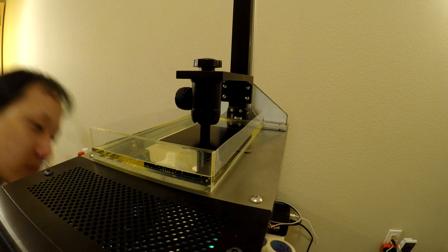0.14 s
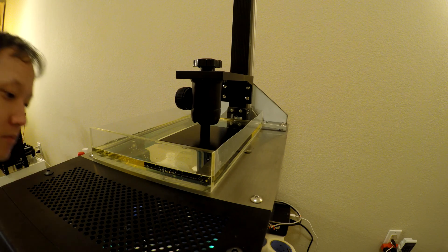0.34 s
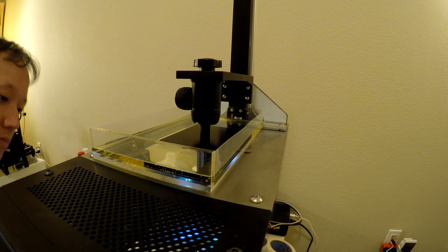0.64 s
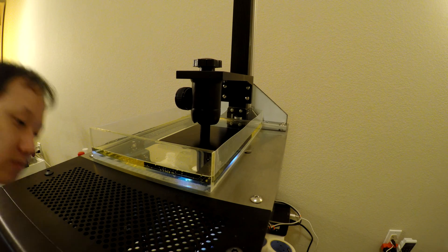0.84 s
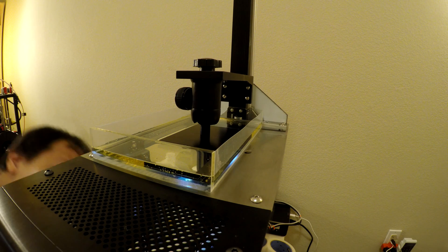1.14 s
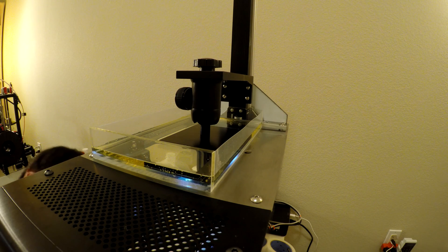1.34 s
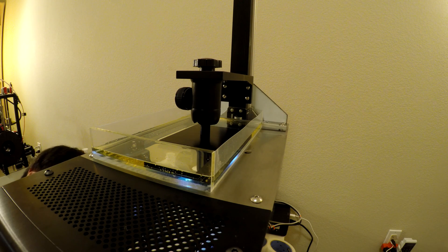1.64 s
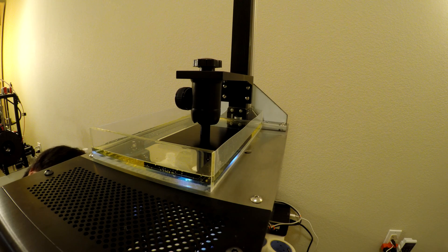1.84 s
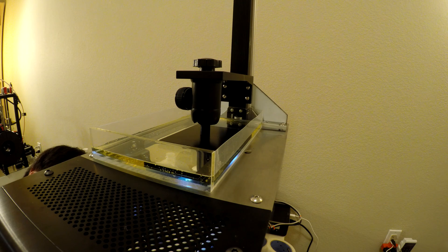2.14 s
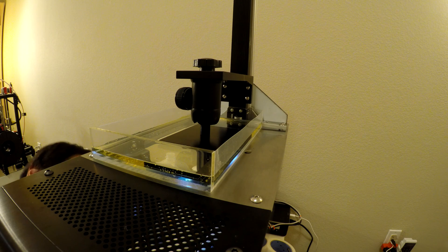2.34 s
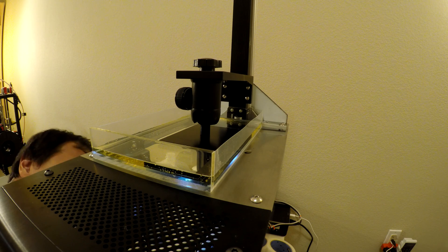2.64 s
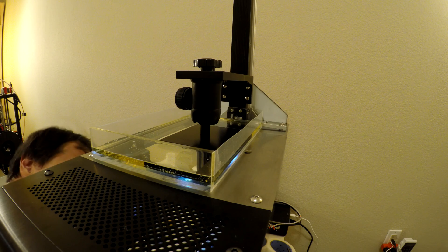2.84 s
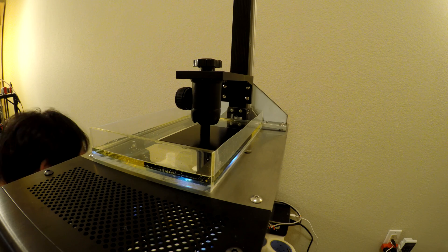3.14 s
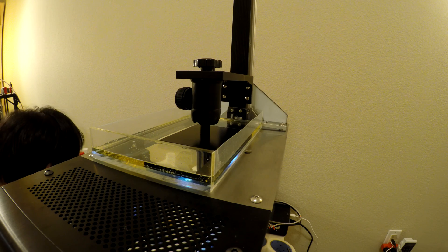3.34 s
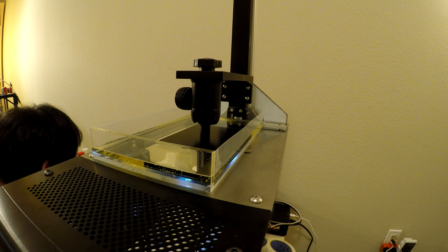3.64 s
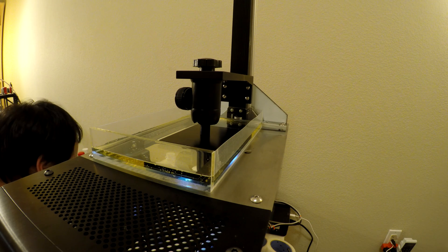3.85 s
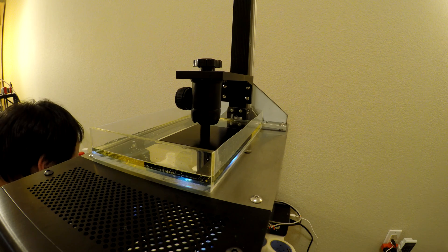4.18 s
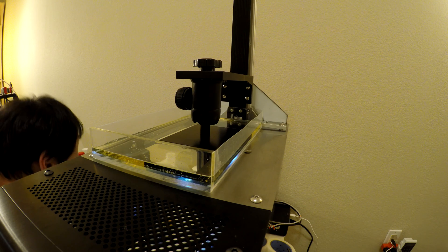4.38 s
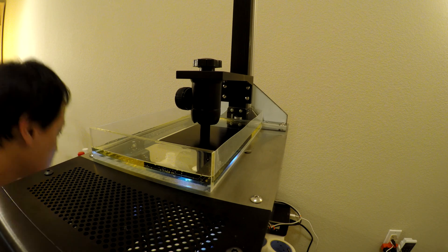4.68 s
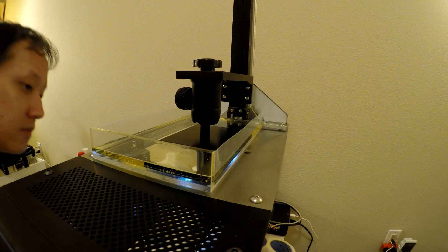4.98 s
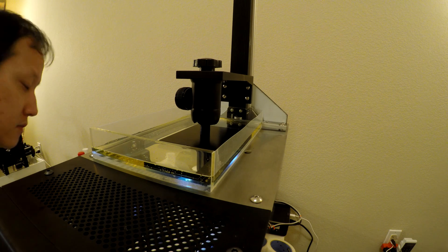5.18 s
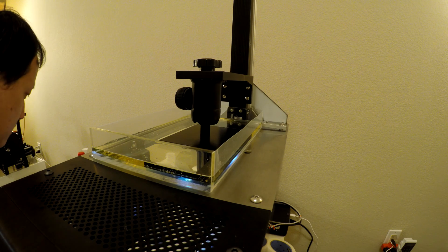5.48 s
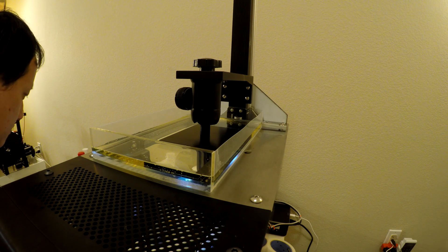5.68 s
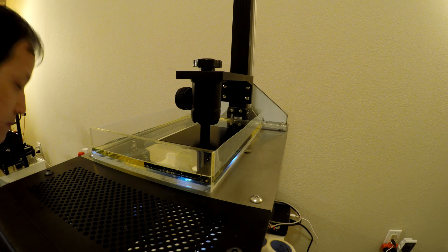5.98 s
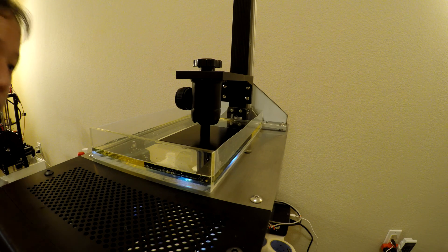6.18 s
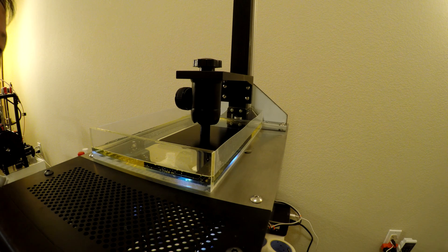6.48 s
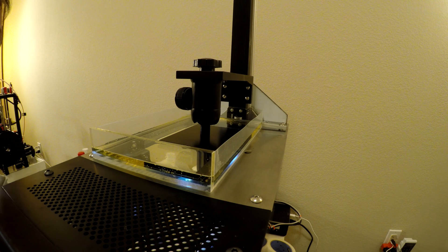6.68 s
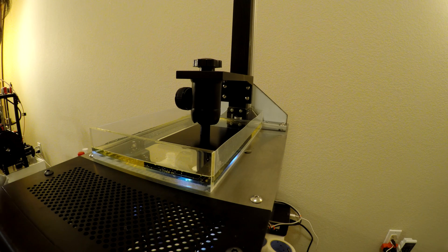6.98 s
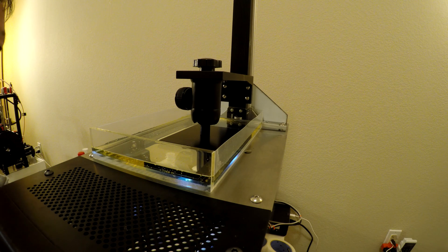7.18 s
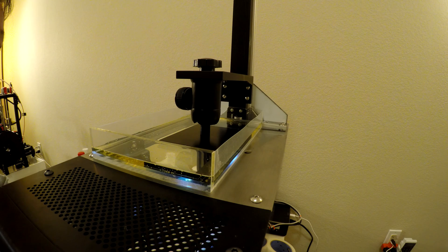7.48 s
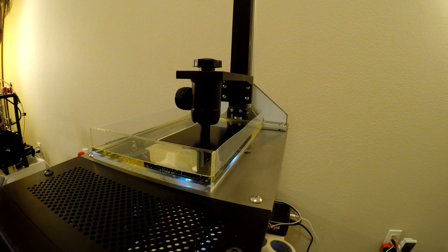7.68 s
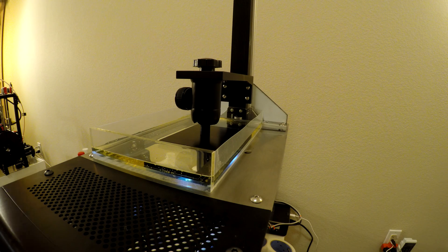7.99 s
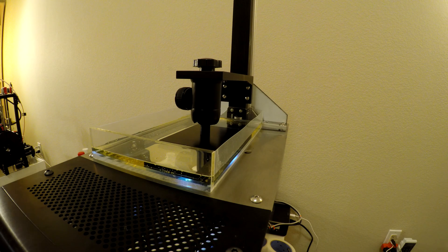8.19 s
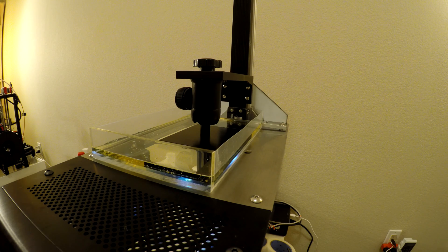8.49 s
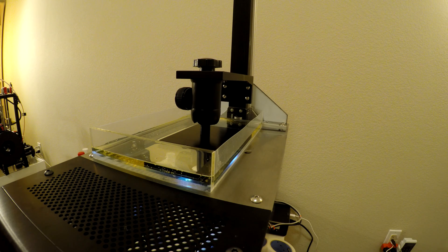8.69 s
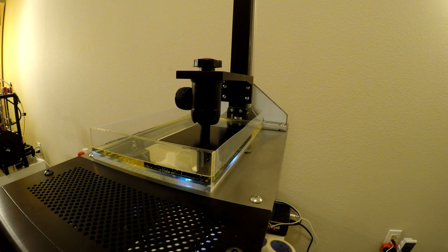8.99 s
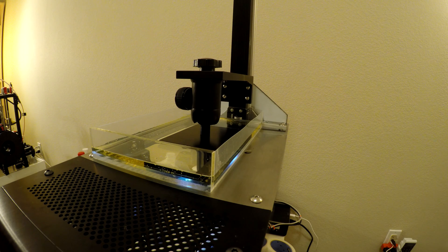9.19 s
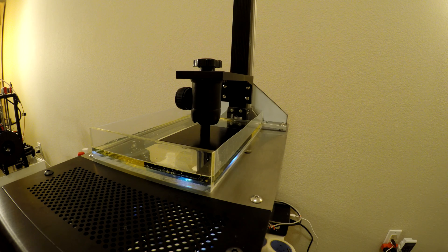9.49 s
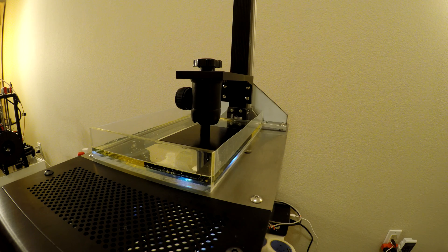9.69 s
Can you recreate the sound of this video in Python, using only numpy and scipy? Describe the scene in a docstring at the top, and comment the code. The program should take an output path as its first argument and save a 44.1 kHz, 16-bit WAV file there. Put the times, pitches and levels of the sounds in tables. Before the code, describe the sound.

Close to an idling printer-like machine indoors: constant low hum, slightly wavering fan tones and airy whirr. Someone handles it early on, with faint brushing, dull double taps, small ticks and a sharp snapping click, then a hard knock with a bright metallic rattle, a low boomy panel thud and a quick double tick. Short room reflections follow. The rest is uninterrupted machine drone, save one faint late tick.

```python
"""Idling printer, handled by someone

A printer idles in a small workroom: its supply hums and its fans whirr, all built from wandering sine partials.
Rotor vibration throbs in the bench; filtered noise gives rumble, rush, case resonances and a faint high hiss.
Early on come taps, brushes, a sharp click, a knock that rattles and a panel settling; one faint tick comes late.
Blows are noise cracks with ringing modes, thuds are decaying low sines and brushes are bursts of grainy noise."""
import sys
import numpy as np
from scipy import signal
from scipy.fft import rfft, irfft, next_fast_len
from scipy.io import wavfile

SR = 44100
rng = np.random.default_rng(int(sys.argv[2]) if len(sys.argv) > 2 else 0)


def transcribe(signal):
    """Save signal, clipped to [-1, 1], as a 16-bit WAV file at the path in sys.argv[1]."""
    frames = np.atleast_2d(signal).T
    limited = np.clip(frames, -1, 1)
    pcm = np.round(limited * 32767).astype(np.int16)
    wavfile.write(sys.argv[1], SR, pcm)


N = 433503
TIME = np.arange(N) / SR


def from_db(db):
    """Decibels to gain."""
    return 10 ** (np.asarray(db) / 20)


def rms_one(x):
    """Scale to unit rms."""
    return x / np.sqrt(np.mean(x ** 2) + 1e-30)


def shaped_noise(gain_at):
    """Noise whose density per root Hz is gain_at(frequency)."""
    size = next_fast_len(N, real=True)
    hz = np.maximum(np.fft.rfftfreq(size, 1 / SR), 1e-3)
    spectrum = rfft(rng.standard_normal(size)) * gain_at(hz)
    return irfft(spectrum, size)[:N] * np.sqrt(SR / 2)


def coloured(spectrum):
    """Noise that follows (Hz, dB per Hz) points and falls away beyond both ends."""
    points, db = np.transpose(spectrum)

    def gain_at(hz):
        skirts = np.minimum(1, np.minimum(hz / points[0], points[-1] / hz)) ** 4
        return from_db(np.interp(np.log(hz), np.log(points), db)) * skirts

    return shaped_noise(gain_at)


def drift(rate_hz):
    """Random movement of unit rms, mostly slower than rate_hz."""
    return rms_one(shaped_noise(lambda hz: 1 / (1 + (hz / rate_hz) ** 2)))


def tones(rate_hz, orders, wander, flutter_db):
    """Partials locked to one slightly wandering rate, each fluttering by itself."""
    turns = np.cumsum(rate_hz * (1 + wander * drift(0.95))) / SR
    out = np.zeros(N)
    for order, db in orders:
        phase = 2 * np.pi * (round(order) * turns + rng.random())
        level = np.sqrt(2) * from_db(db + flutter_db * drift(1.6))
        out += level * np.sin(phase)
    return out


def hum():
    """The supply hums at even multiples of the mains rate, strongest at twice that rate."""
    # supply partials: multiple of the mains rate, rms level before flutter/dB
    partials = [(2, -23.3), (4, -52.3), (10, -64.6), (22, -75.5), (24, -78.5), (26, -79.5), (28, -68.5)]
    return tones(59.978, partials, wander=.00008, flutter_db=.22)


def large_fan():
    """Seven blades and a four-pole motor give tones locked to the rotation, under a slow swell."""
    # blade and motor tones: multiple of the rotation rate, rms level before flutter and swell/dB
    partials = [(7, -47.5), (14, -64), (20, -67), (21, -79.5), (24, -59.5), (28, -70), (40, -79.5),
                (42, -76)]
    # slow swell of the tones: t/s, added level/dB
    swell = [(0, 1.5), (1.4, -1), (9.8, 2)]
    swell_gain = from_db(np.interp(TIME, *np.transpose(swell)))
    return swell_gain * tones(46.012, partials, wander=0.000287, flutter_db=1.0)


def small_fan():
    """A second fan turns a little slower, its tones fluttering more strongly."""
    # fan tones: multiple of the rotation rate, rms level before flutter/dB
    partials = [(1, -40.5), (16, -63), (20, -79), (36, -86)]
    return tones(44.02, partials, wander=0.00056, flutter_db=3.0)


def throb():
    """Rotor vibration carried by the bench, as low tones that wander separately."""
    # bench tones: f/Hz, rms level before flutter/dB
    vibrations = [(40.72, -29.6), (115.15, -53), (117.5, -55)]
    return sum(tones(hz, [(1, db)], wander=.0006, flutter_db=.3) for hz, db in vibrations)


def with_echo(events, change_db):
    """Follow each contact with its return from the far wall, at another strength."""
    lag_s = 0.023
    s, db, ring_db, soft_hz = np.transpose(events)
    echoes = np.column_stack([s + lag_s, db + change_db, ring_db + change_db, soft_hz])
    return np.vstack([events, echoes])


def blows(events, colour, modes, crack_t60, room_db, room_t60, scatter):
    """Each contact cracks with a diffuse tail and tops up the energy ringing in the part's modes."""
    out, grain = np.zeros(N), rms_one(coloured(colour))
    hz, mode_db, t60 = np.transpose(modes)[:, :, None]
    # work only on the half second after each contact
    live = np.any([(TIME >= s) & (TIME < s + .5) for s, *_ in events], axis=0)
    t, energy = TIME[live], 0
    for s, db, ring_db, soft_hz in events:
        age = np.maximum(t - s, 0)
        # reflections take a few milliseconds to build up
        build = np.sqrt(1 - np.exp(-age / 0.0035))
        direct = from_db(db - 60 * age / crack_t60)
        tail = build * from_db(db + room_db - 60 * age / room_t60)
        fade = (age > 0) * np.hypot(direct, tail)
        crack = fade * np.roll(grain, rng.integers(N))[live]
        # a softer contact is duller and slower to take hold
        dulling = signal.butter(2, min(soft_hz, SR / 2 - 1), fs=SR, output="sos")
        out[live] += signal.sosfilt(dulling, crack)
        push = (1 - np.exp(-age * soft_hz)) / np.hypot(1, (hz / soft_hz) ** 2)
        strike_db = ring_db + mode_db + rng.normal(0, 1.5, hz.shape)
        energy = energy + (push * from_db(strike_db - 60 * age / t60)) ** 2
    # reflections arrive in every phase, so each ring shimmers as it dies
    slow = signal.butter(2, 60, fs=SR, output="sos")
    shimmer = rms_one(signal.sosfilt(slow, rng.standard_normal((2, len(hz), len(t)))))
    carriers = np.exp(2j * np.pi * (hz * t + rng.random(hz.shape)))
    waves = (1 + scatter * (shimmer[0] + 1j * shimmer[1])) * carriers
    out[live] += np.sum(np.sqrt(energy) * np.imag(waves), axis=0)
    return out


def clicks():
    """A switch crackles over and latches after a faint soft onset, setting its modes ringing."""
    # onset and contacts: t/s, crack level/dB, ring level/dB, contact cut-off f/Hz
    contacts = [(0.7725, -40, -57, 6000), (0.776, -39, -57, 6000), (0.7797, -27, -41.5, 13000),
                (0.7822, -28, -46, 13000), (0.7848, -24.5, -45, 13000), (0.7872, -27, -53, 11000)]
    # crack spectrum: f/Hz, relative density/dB per Hz
    colour = [(400, -11), (750, -1), (1000, -11), (1450, -1), (1800, -9), (2150, -6), (2900, -3.5),
              (3300, -5), (4000, -3), (5200, -7), (7600, -9.5), (9000, -9), (10200, -15), (11400, -9),
              (12300, -15), (15000, -21)]
    # what the switch rings with: f/Hz, relative level/dB, t60/s
    modes = [(1348, -6, .15), (2108, -6, .17), (2460, -3, .1), (2780, -4, .13), (3052, -7, .2),
             (3623, -4, .16), (3981, 2, .17), (4378, -2, .16), (4732, -5, .16), (5663, -7, .17),
             (6045, -7, .16), (6449, -9, .17), (6821, -8, .14), (7241, -10, .21), (8909, -8, .21),
             (9150, -11, .21), (9400, -11, .21), (11300, -11, .09)]
    return blows(with_echo(contacts, change_db=-9), colour, modes,
                 crack_t60=0.011, room_db=-14.5, room_t60=0.23, scatter=0.74)


def knocks():
    """A knock on the case and its bounces excite the case modes."""
    # contacts: t/s, crack level/dB, ring level/dB, contact cut-off f/Hz
    contacts = [(1.847, -37, -63, 5960), (1.8698, -28, -37, 11000), (1.8724, -25, -32.5, 5000),
                (1.8895, -28, -43, 6000), (1.8935, -26.5, -39, 3000)]
    # crack spectrum: f/Hz, relative density/dB per Hz
    colour = [(300, -14), (450, 3), (570, -1), (700, 0), (930, -7), (1200, 0), (1520, -12.5), (2100, -7),
              (2750, -4.5), (3300, -18), (5400, -21), (7000, -22.5), (10500, -31), (15000, -34)]
    # what the case rings with: f/Hz, relative level/dB, t60/s
    modes = [(323, -7, .22), (463, 1, .1), (570, -4, .06), (685, 0, .09), (790, 0, .07), (955, -3, .12),
             (1020, -1, .06), (1130, 0, .06), (1270, 1, .08), (1900, -11, .1), (2056, -9, .12),
             (2239, -9, .14), (2640, -13, .14), (2907, -14, .15)]
    return blows(with_echo(contacts, change_db=-8.5), colour, modes,
                 crack_t60=0.018, room_db=-12, room_t60=0.24, scatter=0.49)


def rattles():
    """A loose metal fitting rattles brightly with the knock."""
    # contacts: t/s, crack level/dB, ring level/dB, contact cut-off f/Hz
    contacts = [(1.8712, -37, -45, 14000), (1.8908, -34.5, -49, 14000), (1.9135, -46, -57, 14000)]
    # crack spectrum: f/Hz, relative density/dB per Hz
    colour = [(3400, -5), (4150, 5), (4900, -7), (5450, -2), (6600, -6), (9900, -9), (15000, -21)]
    # what the fitting rings with: f/Hz, relative level/dB, t60/s
    modes = [(4134, -4, .22), (4420, -8, .2), (5350, 1, .11), (5560, -4, .1), (5800, -9, .17),
             (7280, -12, .2), (8161, -6, .13), (9950, -14, .17), (11150, -13, .15), (12730, -8, .17),
             (13750, -15, .13)]
    return blows(contacts, colour, modes, crack_t60=0.012, room_db=-11.0, room_t60=0.3, scatter=0.57)


def settles():
    """A panel drops back into its seat in a run of duller contacts."""
    # contacts: t/s, crack level/dB, ring level/dB, contact cut-off f/Hz
    contacts = [(1.9872, -35, -58, 2200), (1.9925, -34, -45.5, 7000), (1.9972, -30.5, -47, 4500),
                (2.0022, -35, -55, 4500), (2.019, -38, -56, 1500)]
    # crack spectrum: f/Hz, relative density/dB per Hz
    colour = [(200, -2), (310, 12), (450, -7), (600, -3), (900, 0), (1250, -1), (1520, -19), (2250, -6),
              (2850, -13), (3500, -18), (4300, -11), (5000, -19), (5800, -17), (8000, -24), (15000, -34)]
    # what the panel rings with: f/Hz, relative level/dB, t60/s
    modes = [(305, 1, .2), (620, -3, .12), (900, -1, .12), (1000, -2, .11), (1130, -3, .1), (1254, -4, .13),
             (2073, -4, .18), (2229, -3, .21), (2449, -5, .16), (3951, -15, .25), (4317, -7, .21),
             (5319, -15, .19), (5841, -13, .18)]
    return blows(with_echo(contacts, change_db=-10), colour, modes,
                 crack_t60=0.021, room_db=-6.5, room_t60=0.29, scatter=0.7)


def releases():
    """A catch springs back with a quick double tick and a fainter one after it."""
    # contacts: t/s, crack level/dB, ring level/dB, contact cut-off f/Hz
    contacts = [(2.1594, -27.5, -51, 12000), (2.1618, -32, -53, 12000), (2.1716, -43, -61, 8000)]
    # crack spectrum: f/Hz, relative density/dB per Hz
    colour = [(450, 4), (1100, -2), (1400, 5), (1700, -3), (2050, 1), (2500, -3), (3300, -9), (3950, -2),
              (4300, -11), (4750, -6), (7300, -15), (8000, -21), (8800, -16), (15000, -27)]
    # what the catch rings with: f/Hz, relative level/dB, t60/s
    modes = [(1420, 2, .1), (2030, 0, .15), (2450, -5, .12), (3903, -1, .07), (4640, -12, .15),
             (5577, -15, .15), (8705, -16, .15)]
    return blows(with_echo(contacts, change_db=-9), colour, modes,
                 crack_t60=0.0085, room_db=-12.5, room_t60=0.21, scatter=.4)


def taps():
    """Soft contacts pass little treble and leave a short hollow ring."""
    # contacts: t/s, crack level/dB, ring level/dB, contact cut-off f/Hz
    contacts = [(0.46, -38, -34, 1100), (0.467, -37, -34, 1000), (0.5335, -40, -35.5, 1000),
                (0.5405, -34, -30, 1000), (0.561, -42, -37, 1000)]
    # crack spectrum: f/Hz, relative density/dB per Hz
    colour = [(300, -20), (480, -12), (570, -4), (720, -6), (850, -22), (2500, -16)]
    # the hollow ring: f/Hz, relative level/dB, t60/s
    modes = [(558, -1, .06), (595, 0, .065), (650, -8, .17), (695, -4, .05)]
    return blows(with_echo(contacts, change_db=-12), colour, modes,
                 crack_t60=0.04, room_db=-10, room_t60=.22, scatter=0.18)


def ticks():
    """A loose part gives small ticks, each with a thin ring."""
    # contacts: t/s, crack level/dB, ring level/dB, contact cut-off f/Hz
    contacts = [(0.6895, -33.5, -45, 9000), (0.6958, -39, -48, 9000), (0.977, -44, -66, 4000),
                (1.672, -42.5, -63, 4000), (7.947, -45, -68, 5000)]
    # crack spectrum: f/Hz, relative density/dB per Hz
    colour = [(900, -12), (1950, 3.5), (2400, 9), (3000, 5), (3350, -9), (3800, 2), (4500, -5), (7000, -25),
              (14000, -30)]
    # what the loose part rings with: f/Hz, relative level/dB, t60/s
    modes = [(1534, -10, .24), (1930, -7, .17), (2261, -10, .2), (2975, 1.5, .17), (8802, -19, .25)]
    return blows(contacts, colour, modes, crack_t60=0.017, room_db=-14, room_t60=0.32, scatter=0.33)


def thuds():
    """Each push on the machine makes the bench boom: a low note that builds up, then dies away."""
    # pushes: t/s, level before build-up and decay/dB
    pushes = [(0.481, -31), (0.649, -33.5), (0.79, -37.5), (1.865, -31), (1.992, -22), (2.162, -31.5)]
    bench_hz, build_s, t60_s = 198, 0.021, 0.3
    out = np.zeros(N)
    for s, db in pushes:
        age = np.maximum(TIME - s, 0)
        swell = 1 - np.exp(-(age / build_s) ** 2)
        note = np.sin(2 * np.pi * (bench_hz * age + rng.random()))
        out += swell * from_db(db - 60 * age / t60_s) * note
    return out


def brushes():
    """Light, grainy brushes that swell and fade, and one very short bright tick."""
    # brushes and the short tick: centre t/s, half length/s, rms level at the centre/dB
    bursts = [(0.11, 0.046, -56.5), (0.432, 0.013, -58), (0.593, .004, -52), (0.648, 0.019, -51),
              (0.69, 0.32, -56.5)]
    # noise spectrum: f/Hz, relative density/dB per Hz
    colour = [(900, 0), (2500, 1), (5000, -4), (8000, -10.5), (11500, -11.5), (15000, -18)]
    swell = sum(from_db(db) * np.exp(-.5 * ((TIME - s) / length) ** 2) for s, length, db in bursts)
    grainy = coloured(colour) * from_db(1.2 * drift(120))
    return swell * rms_one(grainy)


def resonant_air():
    """Resonant air noise in the case, plus a faint high hiss band near 13.9 kHz."""
    # case resonances and, last, the hiss band: f/Hz, width/Hz, rms level/dB
    bands = [(199.6, 4.9, -59.5), (392.7, 3.8, -64.5), (442.5, 23, -56.5), (556.5, 16, -58),
             (1070, 39, -63.5), (2500, 53, -71), (13900, 250, -89)]
    out = np.zeros(N)
    for hz, width, db in bands:
        band = shaped_noise(lambda f: 1 / (1 + ((f - hz) / width) ** 2))
        out += from_db(db) * rms_one(band)
    return out


def moving_air():
    """Air rumbles in the case and room and rushes through the grille, both as steady noise."""
    # low rumble: f/Hz, density/dB per Hz
    rumble = [(12, -67), (23, -47), (32, -58.5), (41, -55), (49, -49.5), (58, -59.5), (67, -56), (74, -67),
              (105, -65), (122, -60), (135, -67.5), (150, -61.5), (175, -78), (240, -82.5), (500, -110)]
    # grille rush: f/Hz, density/dB per Hz
    rush = [(100, -84.5), (210, -71.5), (350, -71.5), (490, -76.5), (700, -76), (900, -82), (1350, -83),
            (1650, -85.5), (2450, -89), (2900, -92.5), (5200, -96.5), (8000, -101.7), (12400, -104.6),
            (15000, -109)]
    return coloured(rumble) + coloured(rush)


def scene():
    """The steady machine and the handling of it, on one channel."""
    machine = hum() + large_fan() + small_fan() + throb()
    handling = clicks() + knocks() + rattles() + settles() + releases() + taps() + ticks()
    handling += thuds() + brushes()
    air = resonant_air() + moving_air()
    return (machine + handling + air)[None]


def record(dry):
    """The top is cut steeply by a low-pass filter."""
    # a mirrored lead-in lets the filter settle before the start
    lead = SR // 10
    padded = np.pad(dry, ((0, 0), (lead, 0)), mode="reflect", reflect_type="odd")
    top_cut = signal.ellip(10, .1, 90, 15050, fs=SR, output="sos")
    return signal.sosfilt(top_cut, padded)[:, lead:]


dry = scene()
out = record(dry)
transcribe(out)
```